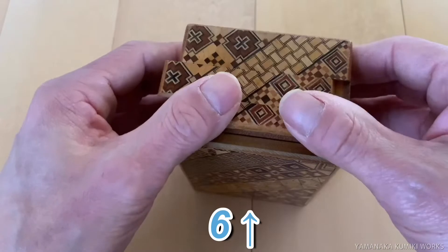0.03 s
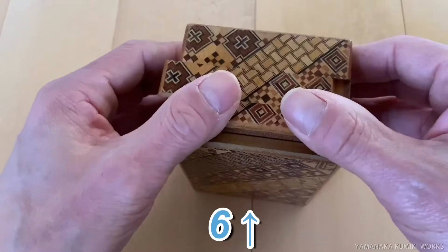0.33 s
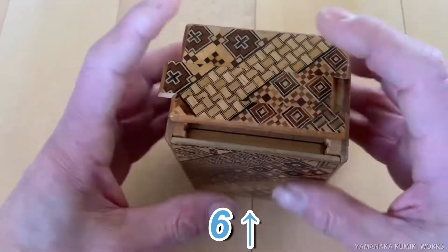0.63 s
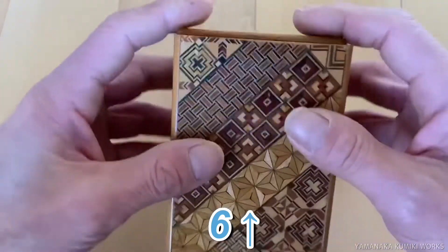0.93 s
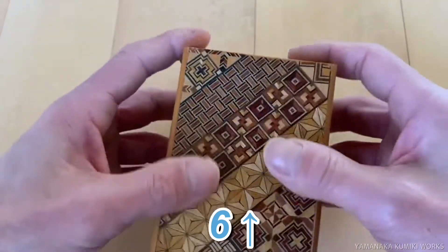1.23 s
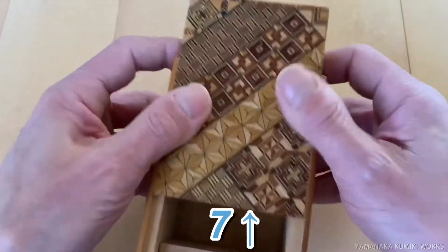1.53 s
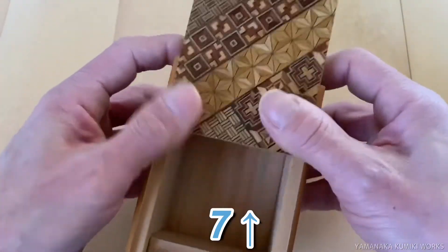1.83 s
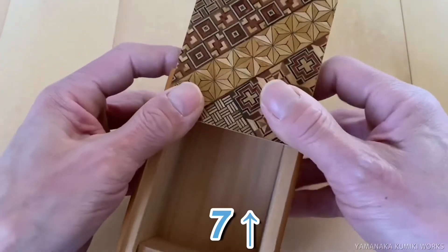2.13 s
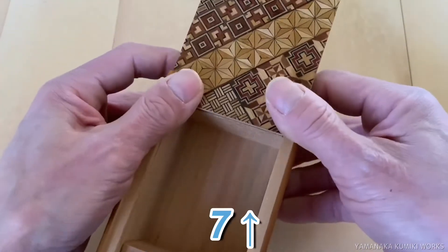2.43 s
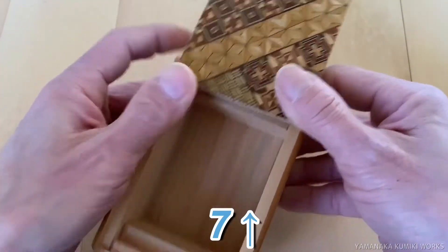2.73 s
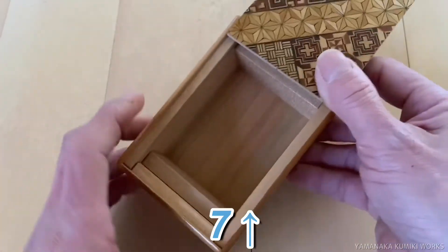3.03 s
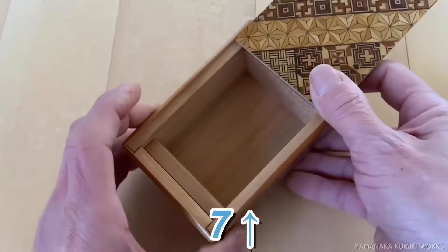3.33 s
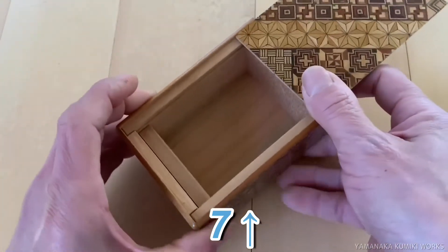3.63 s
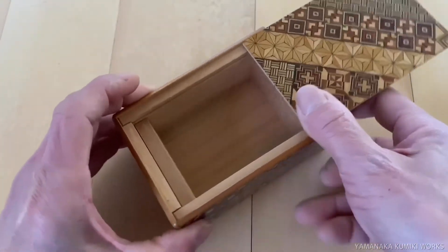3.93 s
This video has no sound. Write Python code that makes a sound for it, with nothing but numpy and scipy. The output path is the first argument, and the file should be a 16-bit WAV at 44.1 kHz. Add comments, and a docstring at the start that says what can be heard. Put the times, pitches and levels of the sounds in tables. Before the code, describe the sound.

A wooden puzzle box is handled close up in a small quiet room, with soft finger rubs and ticks. At 1.2 seconds the lid frees with a dull thock and slides, rasping and chattering until about 2. Light rubs, ticks and faint squeaks follow. At 3 the box lands on a table with a hollow knock, the loudest sound. From 3.7 it knocks again and scrapes along.

```python
"""In a small quiet room, fingers brush a wooden puzzle box close to the microphone and its panels tick.
At 1.2 s the lid breaks free with a dull thock and slides open, rasping and chattering in its grooves.
More rubs, ticks and faint squeaks follow. At 3 s the box is set down on the table with a hollow knock.
From 3.7 s it is pushed along, knocking once more as it starts to scrape.
Every rub is a stream of tiny slips; every knock is a few fading tones plus a short burst of noise."""
import sys
import numpy as np
from scipy import signal
from scipy.fft import rfft, irfft, next_fast_len
from scipy.io import wavfile
from scipy.ndimage import map_coordinates

SR = 44100
rng = np.random.default_rng(int(sys.argv[2]) if len(sys.argv) > 2 else 0)


def master(y):
    """Save y as 16-bit WAV."""
    cut = np.clip(np.atleast_2d(y).T, -1, 1)
    pcm = np.round(cut * 32767)  # scale
    wavfile.write(sys.argv[1], SR, pcm.astype(np.int16))


N = 176400  # 4 seconds
ATTACK_S = 0.00032  # how quickly struck wood starts to sound

# The hiss of skin sliding on wood. Each row: frequency in Hz, relative level in dB.
SKIN_HISS = [(3000, -33.5), (6000, -3.5), (8000, 1.5), (10000, 4.5), (12000, -19.5), (13500, 0),
             (15500, -13.5)]


def amp(db):
    """Turn decibels into a number to multiply by."""
    return 10 ** (np.asarray(db) / 20)


def unit(x):
    """Scale a signal so that its average strength (rms) is 1."""
    return x / np.sqrt(np.mean(x ** 2) + 1e-20)


def clock():
    """The time of every sample, in seconds."""
    return np.arange(N) / SR


def along(points, hz):
    """Read a curve of (Hz, value) points, giving every octave equal space."""
    freqs, values = np.transpose(points)
    return np.interp(np.log(hz + 1), np.log(freqs + 1), values)


def filtered(x, response):
    """Multiply each frequency in x by response(hz)."""
    size = next_fast_len(N + 8192)
    return irfft(rfft(x, size) * response(np.fft.rfftfreq(size, 1 / SR)), size)[..., :N]


def coloured(x, spectrum):
    """Shape the tone of x with (Hz, dB) points, then scale it to strength 1."""
    return unit(filtered(x, lambda hz: amp(along(spectrum, hz))))


def wobble(rate):
    """A smooth random curve that passes through `rate` new values a second."""
    seconds = np.linspace(0, N / SR, num=8192)
    curve = map_coordinates(rng.standard_normal(4096), [seconds * rate], mode="wrap")
    return np.interp(clock(), seconds, curve)


def spread(pair, width):
    """Make left and right from one shared signal and one that is added left, subtracted right."""
    return np.array([pair[0] + width * pair[1], pair[0] - width * pair[1]])


def level(rows):
    """A loudness curve through (seconds, dB) points, silent outside them."""
    times, db = np.transpose(rows)
    return amp(np.interp(clock(), times, db, left=-120, right=-120))


def arch(start, length):
    """A swell that rises and falls like half a sine wave."""
    return np.sin(np.pi * np.clip((clock() - start) / length, 0, 1))


def ring(tones, t, rise):
    """Tones struck at t = 0. A fade time, here and below, is the time taken to drop 60 dB."""
    t = np.maximum(t, 0)
    ringing = sum(amp(db - 60 * t / fade) * np.sin(2 * np.pi * hz * t) for hz, db, fade in tones)
    return ringing * (1 - np.exp(-t / rise))


def add(track, start, sound):
    """Mix a sound into the track, `start` seconds in."""
    part = track[round(start * SR):][:len(sound)]
    part += sound[:len(part)]


def rumble():
    """The room's steady low rumble and faint airy hiss, wider in the highs."""
    # The tone of the quiet room. Each row: frequency in Hz, relative level in dB.
    colour = [(12, -57), (20, -26), (36, -7.5), (70, 2), (207, -11), (274, -15), (452, -26), (549, -32.5),
              (932, -31), (1270, -37), (1980, -47), (3000, -51), (4070, -54), (15500, -56.5)]
    width = [(100, 0.16), (2000, 1.0)]  # Each row: frequency in Hz, stereo width.
    noise = coloured(rng.standard_normal((2, N)), colour)
    noise = filtered(noise, lambda hz: np.array([np.ones_like(hz), along(width, hz)]))
    return amp(-54) * spread(noise, 1.0)


def room(x):
    """Quick echoes of x off the table and hands, then the short tail of the room."""
    # How long the room rings. Each row: frequency in Hz, fade time in seconds.
    fades = [(100, 0.24), (400, 0.26), (1200, 0.43), (2500, 0.24), (6000, 0.22), (15000, 0.45)]
    # The tone of the echoes. Each row: frequency in Hz, relative level in dB.
    colour = [(100, 0.5), (400, 10.5), (1000, -0.5), (1700, 3.5), (2700, 0.5), (15000, 3)]
    # How wide the echoes sound. Each row: frequency in Hz, stereo width (0 is mono).
    width = [(100, 0.13), (400, 0.46), (1500, 1), (6000, 1), (10000, .4)]
    hz, t, bands = signal.stft(rng.standard_normal((2, SR // 2)), SR, nperseg=256)
    bands = spread(bands, along(width, hz)[:, None]) * amp(along(colour, hz))[:, None]
    fading = lambda fade_s: signal.istft(bands * amp(-60 * t / fade_s), SR, nperseg=256)[1]
    early = fading(fade_s=0.048)
    tail = fading(along(fades, hz)[:, None])[::-1]  # left and right swapped
    tail = np.roll(tail, SR // 256, axis=1)  # about 4 ms after the quick echoes
    echoes = amp(-15.5) * (early / np.linalg.norm(early[0]) + tail / np.linalg.norm(tail[0]))
    echoes = np.pad(echoes, ((0, 0), (SR // 400, 0)))  # all arrive 2.5 ms late
    return signal.fftconvolve(x.mean(0)[None], echoes, axes=1)[:, :N]


def friction(spectrum, ringing):
    """Rubbing: many tiny uneven slips shake the thin panels; `ringing` sets how much they colour it."""
    # Pitches the panels favour. Each row: centre in Hz, width in Hz, boost in dB when ringing is 1.
    panels = [(1080, 53, 2.5), (1340, 130, 2.5), (1860, 130, 7), (2262, 190, 7), (2854, 160, 3),
              (3270, 210, 2), (4345, 380, 5), (4970, 130, 5.5), (6530, 380, 6.5), (8700, 130, -12)]
    slips_per_s, size_spread_db, judder_db = 1800, 2.5, 1.65
    ripple_db, ripple_spacing_hz, shifts_per_s = 4.5, 168, 9
    slips = (rng.random((2, N)) < slips_per_s / SR) * rng.choice([-1, 1], (2, N))
    slips = slips * amp(size_spread_db * rng.standard_normal(N))
    force = unit(slips) + 0.77 * rng.standard_normal((2, N))  # smooth hiss between the slips
    force *= amp(judder_db * wobble(140))
    # Finer peaks and dips wander at random, as if the grip were shifting.
    hz, t, bands = signal.stft(force, SR, nperseg=1024)
    grid = np.meshgrid(hz / ripple_spacing_hz, t * shifts_per_s, indexing="ij")
    ripple = map_coordinates(rng.standard_normal((256, 32)), grid, mode="wrap")
    depth_db = ripple_db * (hz / (hz + 1000))[:, None]  # shallower in the lows
    force = signal.istft(bands * amp(depth_db * ripple), SR, nperseg=1024)[1][:, :N]
    boost_db = lambda f: sum(db / (1 + (2 * (f - centre) / width) ** 2) for centre, width, db in panels)
    wood = filtered(force, lambda f: amp(ringing * boost_db(f)))
    return spread(coloured(wood, spectrum), width=0.45)


def bumps():
    """The hands bump dully on the wood: soft swells of low noise."""
    # The bumps. Each row: start in seconds, length in seconds, level in dB.
    swells = [(-.06, 0.15, -52.5), (0.216, 0.1, -58), (0.656, 0.29, -57.5), (1.564, 0.09, -59.5),
              (1.987, 0.46, -61.5)]
    # Their dull tone. Each row: frequency in Hz, relative level in dB.
    colour = [(30, -38), (70, 5), (130, -3.5), (300, -5.5), (500, -11.5), (1000, -71)]
    loudness = sum(amp(db) * arch(start, length) for start, length, db in swells)
    return loudness * coloured(rng.standard_normal(N), colour)


def fingers():
    """Fingers brush the box: each stroke swells, holds and fades with its own mix of three tones."""
    # The strokes. Each row: middle, rise, hold and fall in seconds, then body, rasp and hiss in dB.
    strokes = [(.272, 0.016, 0.0096, 0.034, -72.5, -73.5, -79), (0.384, 0.11, 0.045, 0.18, -75, -84, -84.5),
               (0.6, 0.0077, 0.0038, 0.022, -70, -63.5, -71.5),
               (0.683, 0.11, 0.082, 0.029, -71, -74.5, -84),
               (0.75, 0.015, 0.0038, 0.015, -86, -61.5, -63.5),
               (0.806, 0.051, 0.06, 0.027, -66.5, -70, -85), (0.934, 0.045, 0.05, 0.082, -68, -77, -86),
               (1.101, 0.018, 0.015, 0.036, -73, -59.5, -56.5), (1.141, 0.017, 0.01, 0.041, -67, -68, -83),
               (2.07, 0.021, 0.033, 0.034, -65, -57, -54.5), (1.998, 0.098, 0.088, 0.044, -71, -74, -83),
               (2.168, 0.06, 0.13, 0.084, -71, -76.5, -105),
               (2.326, 0.056, 0.084, 0.079, -66.5, -69, -75.5),
               (2.364, 0.0088, 0.0037, 0.019, -63, -65, -62),
               (2.469, 0.018, 0.021, 0.11, -65.5, -92, -106.5),
               (2.587, 0.02, 0.014, 0.013, -58.5, -54.5, -58),
               (2.724, 0.076, 0.02, 0.039, -74, -60.5, -70.5),
               (2.738, 0.053, 0.028, 0.022, -78, -81, -54.5), (2.82, 0.044, .05, 0.087, -68, -72, -82),
               (3.019, 0.067, 0.013, 0.02, -66, -63.5, -66.5),
               (3.057, 0.019, 0.0048, 0.032, -73.5, -65, -62),
               (3.504, 0.044, 0.078, 0.096, -77, -84.5, -85),
               (3.639, 0.052, 0.038, 0.044, -69, -81.5, -87.5)]
    # The woody body of a rub. Each row: frequency in Hz, relative level in dB.
    body = [(200, -3.5), (600, 2), (1050, 4.5), (1500, -1.5), (1900, -5.5), (2350, -9), (2700, -6.5),
            (5000, -28)]
    # The brighter rasp of skin. Each row: frequency in Hz, relative level in dB.
    rasp = [(1000, -3.5), (2000, 4), (2700, -2), (3600, 2.5), (4300, -1.5), (6500, -5.5), (10000, -17),
            (15000, -25.5)]
    t, gains = clock(), np.zeros((3, N))
    for middle, rise, hold, fall, *levels_db in strokes:
        before = np.maximum(middle - hold / 2 - t, 0) / rise
        after = np.maximum(t - middle - hold / 2, 0) / fall
        gains += amp(levels_db)[:, None] * np.exp(-2 * np.minimum(before + after, 10) ** 2)
    colours = (body, rasp, SKIN_HISS)
    return sum(gain * friction(colour, ringing=1.11) for gain, colour in zip(gains, colours))


def crack(t):
    """The brief bright snap of hard wood meeting wood at t = 0."""
    # The tone of the snap. Each row: frequency in Hz, relative level in dB.
    colour = [(500, -11), (2000, 17), (5000, -4), (7000, 4), (9000, 1.5), (12000, -5), (15500, -7)]
    fade_s = 0.0091
    t = np.maximum(t, 0)
    gains = amp(along(colour, np.fft.rfftfreq(len(t), 1 / SR)))
    noise = irfft(rfft(rng.standard_normal(len(t))) * gains, len(t))
    return unit(noise) * amp(-60 * t / fade_s) * (1 - np.exp(-t / ATTACK_S))


def ticks():
    """Panels and fingernails tick: each tick is a snap and the short ring of one panel."""
    # The ticks. Each row: start in seconds, level in dB, pitch in Hz, snap in dB relative to that level.
    taps = [(0.5451, -52, 1100, 5), (0.595, -53.5, 1090, 0), (0.7276, -62, 2160, 3),
            (0.9713, -37.5, 1330, -2), (1.7619, -51, 1300, 15), (2.358, -54, 1020, -12),
            (2.494, -47.5, 1093, -28), (2.577, -48.5, 1000, 0), (2.591, -47, 1005, -15),
            (2.9496, -53.5, 1274, -26.5), (3.351, -61, 1872, 6), (3.8, -38, 1050, -30)]
    # A panel's tones. Each row: multiple of the pitch, relative level in dB, fade time in cycles.
    panel_tones = [(0.999, 5, 23), (1.42, -10, 49), (1.72, -7, 37)]
    track, t = np.zeros(N), np.arange(SR // 3) / SR
    for start, db, hz, snap_db in taps:
        tones = [(hz * ratio, tone_db, cycles / (hz * ratio)) for ratio, tone_db, cycles in panel_tones]
        add(track, start, amp(db) * (ring(tones, t, ATTACK_S) + amp(snap_db) * crack(t)))
    return track


def push():
    """The hand slips as it takes hold, and the box scrapes over the table."""
    # How loud the scrape is. Each row: time in seconds, level in dB.
    loudness = [(3.712, -74.5), (3.728, -54), (3.738, -46.5), (3.765, -48), (3.80, -51), (3.85, -55),
                (3.895, -64.5), (3.92, -53.5), (3.955, -47.5), (3.985, -43.5), (4.0, -48)]
    # The tone of the box rubbing the table. Each row: frequency in Hz, relative level in dB.
    tabletop = [(200, -10), (600, -14), (980, -3), (1400, -8.5), (1700, -8.5), (2150, -1), (2400, -4.5),
                (2650, 3), (3050, -12.5), (3800, -5.5), (4300, -21), (5800, -17.5), (6800, -12),
                (10000, -21.5), (15000, -35)]
    scrape = level(loudness) * friction(tabletop, ringing=0.2)
    hand_slip = amp(-47.5) * arch(start=3.727, length=0.045) * friction(SKIN_HISS, ringing=0.67)
    return scrape + hand_slip


def knocks():
    """In each knock the box lands on two edges in turn, ringing its walls and the hollow inside."""
    # The knocks. Each row: start in seconds, level in dB, delay of the second edge in seconds, its
    # relative dB, softness in seconds, hollow's relative dB, wall pitch factor, wall fade factor,
    # snap's relative dB.
    landings = [(3.0211, -8.5, 0.00197, -17, 0.00033, -3, 0.94, 0.94, -17.5),
                (3.7694, -24.5, 0.00161, 10, 0.000051, 2.5, 1, 0.6, -4)]
    # Wall tones before each knock adjusts them. Each row: pitch in Hz, level in dB, fade in seconds.
    walls = [(821, -16.5, 0.078), (972, -2.5, 0.021), (1054, -3, 0.024), (1172, -10.5, 0.04),
             (1380, -6, 0.022), (1905, 0.5, 0.015), (2250, -14.5, 0.015), (2900, -12.5, 0.017),
             (5090, -15.5, 0.011)]
    # The hollow's low tones. Each row: pitch in Hz, relative level in dB, fade time in seconds.
    hollow = [(190, -25, 0.066), (257.5, -30, 0.12), (290, -18, 0.055), (372.3, -12.5, 0.14),
              (521.6, -20.5, 0.076), (630, -20.5, 0.03)]
    track, t = np.zeros(N), np.arange(SR // 3) / SR
    for start, db, delay, second_db, softness, hollow_db, pitch, fade_factor, snap_db in landings:
        # A softer landing takes more away from the high tones.
        loss_db = lambda hz: 10 * np.log10(1 + (np.pi * hz * softness) ** 2)
        tones = [(hz * pitch, wall_db - loss_db(hz), fade * fade_factor) for hz, wall_db, fade in walls]
        contact = lambda age: ring(tones, age, ATTACK_S) + amp(snap_db) * crack(age)
        edges = contact(t) + amp(second_db) * contact(t - delay)
        boom = amp(hollow_db) * ring(hollow, t, rise=0.00063)
        add(track, start, amp(db) * (edges + boom))
    return track


def lid_release():
    """The lid breaks free with a dull thock, muffled by the hands."""
    # The thock's tones. Each row: pitch in Hz, level in dB, fade time in seconds.
    tones = [(306, -25.5, 0.031), (620, -26.5, 0.018), (770, -19.5, 0.0089), (1780, -36, .02),
             (2240, -32.5, 0.022)]
    start_s = 1.2133
    return ring(tones, clock() - start_s, rise=0.0014)


def lid():
    """The lid rasps along its grooves and chatters at a rough, gliding pitch where it sticks."""
    # How loud the sliding is. Each row: time in seconds, level in dB.
    slide = [(1.175, -78), (1.2, -53), (1.218, -39.5), (1.242, -48), (1.396, -48.5), (1.42, -58),
             (1.448, -50), (1.504, -49.5), (1.635, -61.5), (1.67, -40.5), (1.686, -37), (1.698, -53),
             (1.728, -47), (1.752, -66), (1.785, -75), (1.83, -53), (1.886, -53), (1.99, -84)]
    # The tone of wood rubbing in a groove. Each row: frequency in Hz, relative level in dB.
    groove = [(200, -9), (500, -9), (1000, 0), (1500, 0), (2050, 1), (2700, -6), (3600, -6), (4300, -4),
              (5500, -6), (7500, -3), (10500, -1.5), (12300, -10), (14000, -4), (15500, -13.5)]
    # Groans and squeaks. Each row: start and length in seconds, first and last pitch in Hz, level in dB.
    squeaks = [(1.218, 0.083, 427, 584, -53.5), (1.307, 0.14, 600, 776, -57.5),
               (1.436, 0.034, 1000, 808, -40.5), (1.455, 0.086, 777, 874, -51),
               (1.657, 0.045, 1080, 934, -44.5), (1.646, 0.063, 1463, 1340, -50.5),
               (1.688, 0.056, 980, 1070, -55), (1.798, 0.132, 1010, 1212, -59),
               (2.627, 0.013, 2450, 2280, -50), (2.685, 0.15, 799, 722, -67.5),
               (2.704, 0.21, 476.4, 644, -67.5)]
    overtone_db = -27.5
    # Two random curves make the tone rough: their joint size shakes its level, their angle its pitch.
    rough = unit(wobble(300)) + 1j * unit(wobble(300))
    chatter = np.zeros(N)
    for start, length, first_hz, last_hz, db in squeaks:
        hz = np.interp(clock(), [start, start + length], [first_hz, last_hz])
        phase = 2 * np.pi * np.cumsum(hz) / SR + np.angle(rough)
        tone = np.sin(phase) + amp(overtone_db) * np.sin(2 * phase)
        chatter += amp(db) * arch(start, length) * np.abs(rough) * tone
    return level(slide) * friction(groove, ringing=0.77) + chatter


def left_and_right(x, balance):
    """Sound reaches the two sides of the microphone with unequal level and timing."""
    # How far the left wave runs ahead of the right. Each row: frequency in Hz, lead in radians.
    left_lead = [(100, 0), (800, .45), (1400, .45), (2000, 1.4), (2700, 3), (3400, 3.6), (4200, 5.3),
                 (5000, 5.3), (6400, 3.4), (7500, 2.4), (8800, .4), (9900, -.5), (11300, -3), (12100, -3.3),
                 (13500, -6.1), (15000, -6.5)]
    side = np.array([[0.5], [-0.5]])
    return filtered(x, lambda hz: amp(side * along(balance, hz))
                    * np.exp(1j * side * along(left_lead, hz)))


def scene():
    """The box in the hands, then on the table, with its echoes, over the room's rumble."""
    # Where the held box is heard. Each row: frequency in Hz, left minus right in dB.
    held_balance = [(60, -5), (330, -2.5), (750, 7.5), (1800, 3), (2600, 0.5), (5400, -5.5), (6600, 0),
                    (10000, 0)]
    # Where it is heard on the table. Each row: frequency in Hz, left minus right in dB.
    table_balance = [(60, -3), (380, -2.5), (750, 0), (1300, 0.5), (1900, 5.5), (3000, -4.5), (5500, -2.5),
                     (7000, 1.5), (10000, 0)]
    held = lid() + lid_release() + fingers() + bumps() + ticks()
    on_table = knocks() + push()
    background = rumble()
    held = left_and_right(held + room(held), held_balance)
    on_table = left_and_right(on_table + room(on_table), table_balance)
    return background + held + on_table


def record(dry):
    """The microphone softens the deepest bass and cuts off the highest treble."""
    # The microphone's tone. Each row: frequency in Hz, boost or cut in dB.
    microphone = [(20, -11), (45, 0), (10500, 1), (15800, -3.5)]
    top_hz = 15800
    return filtered(dry, lambda hz: amp(along(microphone, hz)) * (hz < top_hz))


dry = scene()
out = record(dry)
master(out)
```